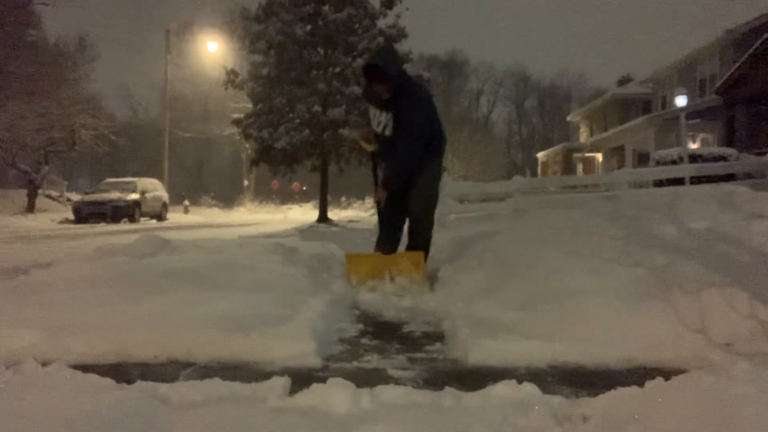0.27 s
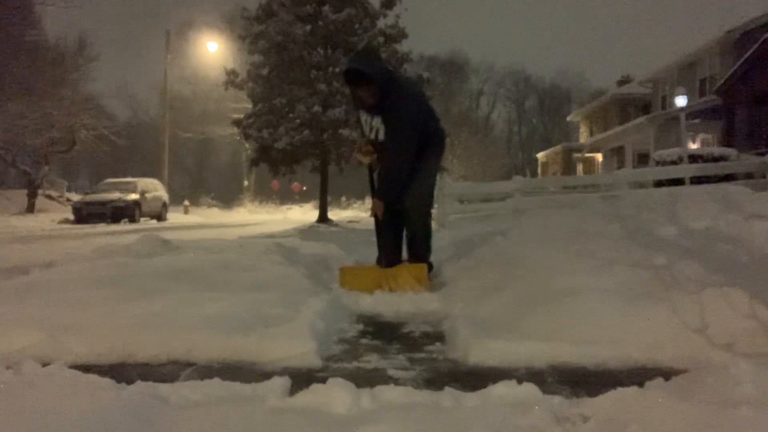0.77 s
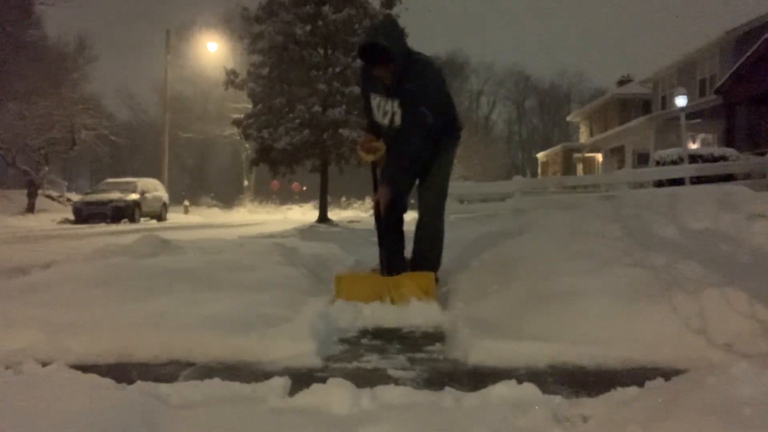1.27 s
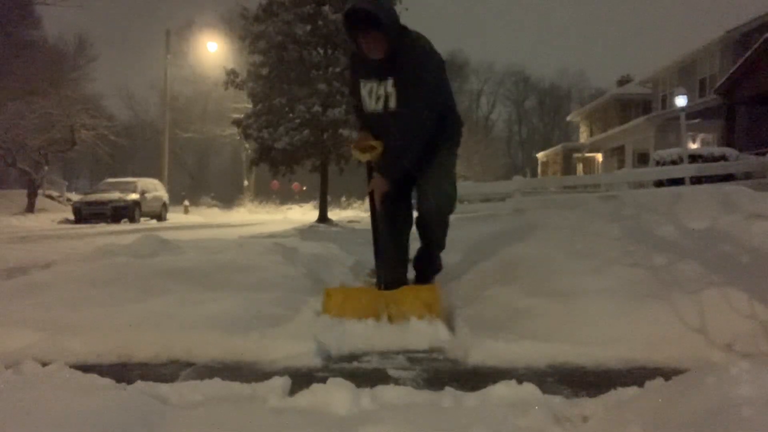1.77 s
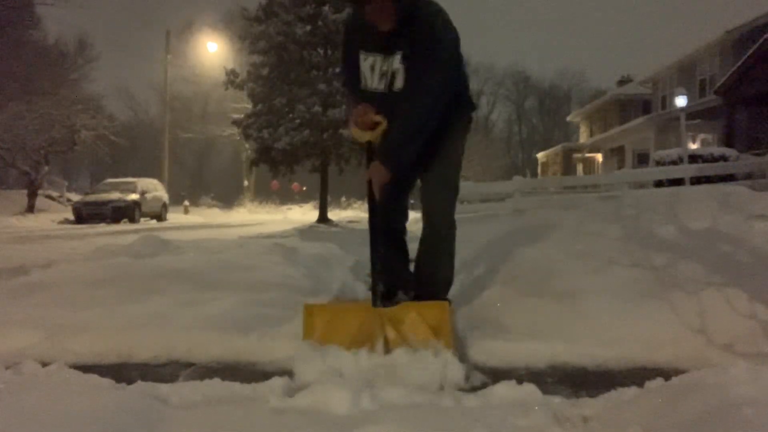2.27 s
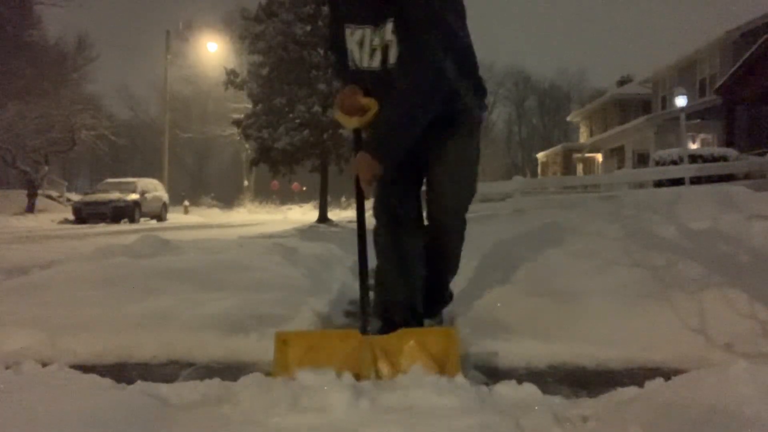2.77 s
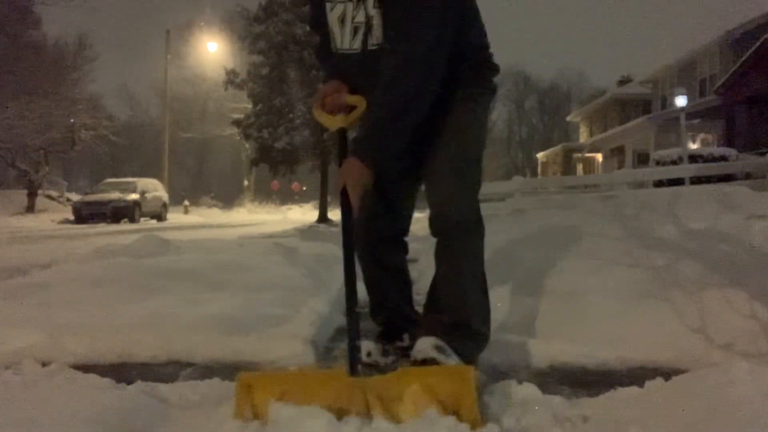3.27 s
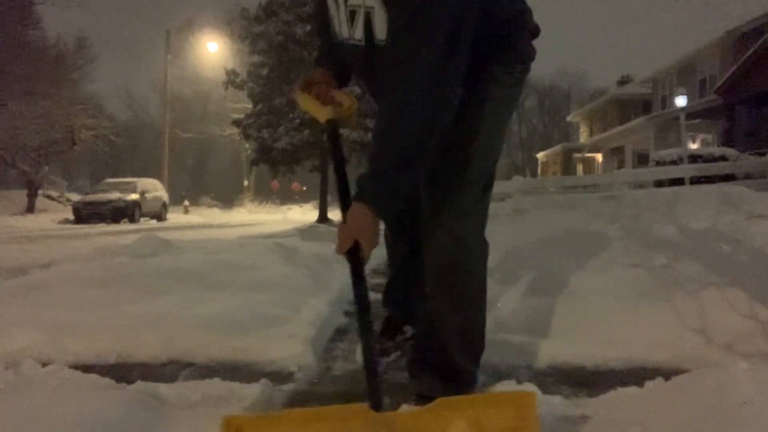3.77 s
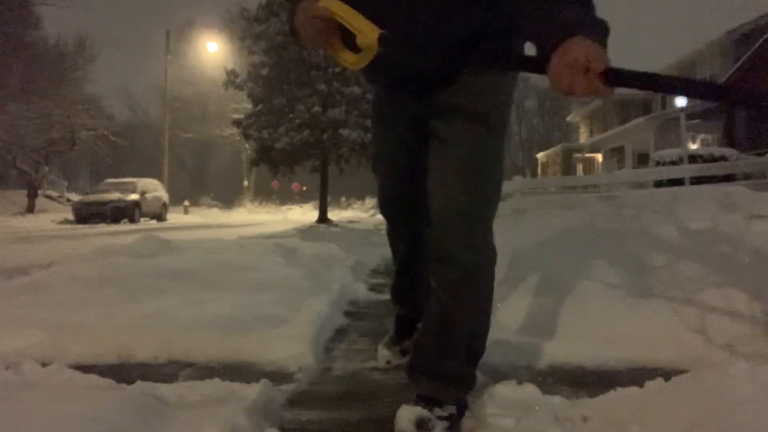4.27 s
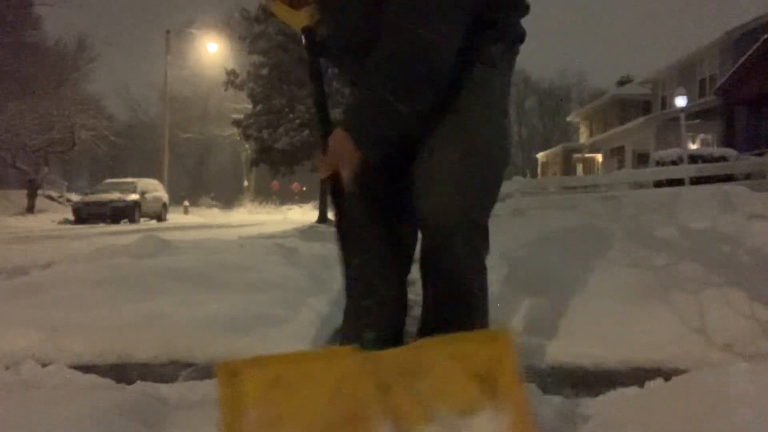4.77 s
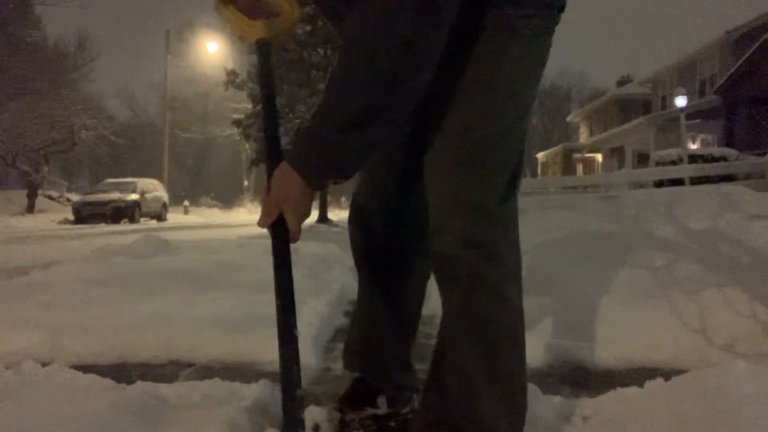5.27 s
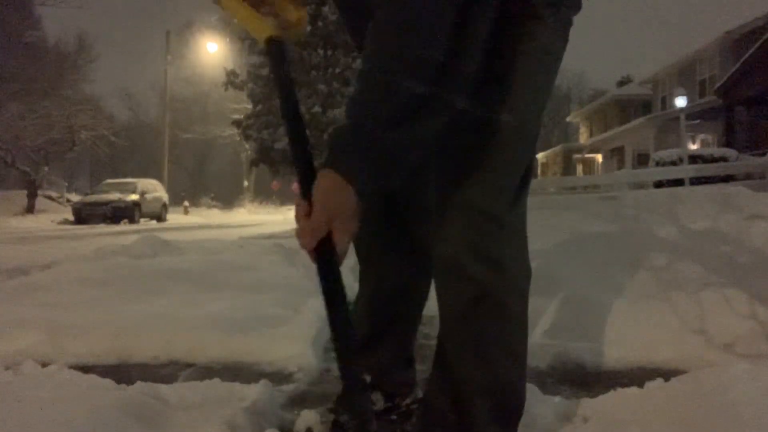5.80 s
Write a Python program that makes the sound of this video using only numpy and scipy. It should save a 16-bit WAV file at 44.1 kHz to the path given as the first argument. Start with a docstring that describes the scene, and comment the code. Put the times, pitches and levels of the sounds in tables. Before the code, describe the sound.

A plastic shovel scrapes snow along pavement in a long, juddering push, pauses, then scrapes twice more, louder and closer.

```python
"""A plastic snow shovel is pushed along a snowy driveway, flings its load, then scrapes twice close by.
Its edge sticks and slips on the pavement and rings the scoop; it catches on bumps and cracks grit,
while snow hisses over the plastic. Boots tread softly and the empty shovel squeaks on the backswing.
Light wind buffets the microphone, a far road murmurs, and a faint, narrow band of background hiss
is heard at the start; the snow swallows all echo."""
import sys
import numpy as np
from scipy import signal
from scipy.fft import rfft, irfft, next_fast_len
from scipy.io import wavfile
from scipy.ndimage import uniform_filter1d, map_coordinates

SR = 44100
rng = np.random.default_rng(int(sys.argv[2]) if len(sys.argv) > 2 else 0)


def int16_out(signal):
    """Quantize to a 16-bit WAV file."""
    q = np.round(np.clip(np.atleast_2d(signal).T, -1, 1) * 32767)
    wavfile.write(sys.argv[1], SR, q.astype(np.int16))


N = 266143
TIME = np.arange(N) / SR
SIZE = next_fast_len(N + SR // 2, True)
FREQ = np.arange(SIZE // 2 + 1) * SR / SIZE


def undb(db):
    """Decibels to gain."""
    return 10 ** (np.asarray(db) / 20)


def unit(x):
    """Scale to rms 1."""
    return x / np.sqrt(np.mean(x ** 2))


def curve(points):
    """Join (frequency, value) points on a log-frequency axis."""
    hz, value = np.transpose(points)
    return np.interp(np.log(FREQ + 1), np.log(hz), value)


def eq(points):
    """The minimum-phase filter that follows (frequency, level) points."""
    cepstrum = irfft(np.log(undb(curve(points))), SIZE)
    cepstrum[1:SIZE // 2] *= 2
    cepstrum[SIZE // 2 + 1:] = 0
    return np.exp(rfft(cepstrum))


def lowpass(hz):
    """Gain of a smooth low-pass; one minus it is the matching high-pass."""
    return 1 / (1 + (FREQ / hz) ** 4)


def resonance(hz, width):
    """Complex gain of one damped mode, 1 at its centre."""
    return 1j * FREQ * width / (hz ** 2 - FREQ ** 2 + 1j * FREQ * width)


def mode_bank(modes):
    """Complex gain of several modes ringing together."""
    return sum(undb(db) * resonance(hz, width) for hz, width, db in modes)


def through(x, gain):
    """Filter by a complex gain per frequency."""
    return irfft(rfft(x, SIZE) * gain, SIZE)[..., :N]


def struck(x, gain):
    """Filter so that a click of size 1 peaks at 1."""
    return through(x, gain / np.abs(irfft(gain, SIZE)).max())


def walk(rate):
    """A random drift of rms 1 that glides to a new value `rate` times a second."""
    hold = max(int(SR / rate), 1)
    return unit(uniform_filter1d(rng.standard_normal(N)[np.arange(N) // hold], hold))


def clicks(rate, spread_db):
    """Random clicks, `rate` a second; a few stand out louder, or softer if the spread is negative."""
    where, chance, polarity = rng.random((int(rate * N / SR), 3)).T
    size = undb(spread_db * np.minimum(-np.log(1 - chance), 4))
    return np.bincount((where * N).astype(int), size * np.sign(polarity - .5), N)


def steady(x, samples):
    """Ride out the slow changes of level and keep the grain."""
    power = np.mean(np.atleast_2d(x) ** 2, axis=0)
    return x / np.sqrt(np.abs(uniform_filter1d(power, samples)) + 1e-9)


def bursts(times, sizes, decay_s, crumble):
    """At each time one click, then a dying crumble; `crumble` weighs that tail against the click."""
    track, age = np.zeros(N + SR), TIME[:SR // 8]
    for start, size, decay in zip(times, sizes, np.broadcast_to(decay_s, len(times))):
        burst = rng.standard_normal(len(age)) * np.exp(-age / decay)
        burst *= crumble / np.linalg.norm(burst)
        burst[0] = 1
        at = int(start * SR)
        track[at:at + len(age)] += size * burst / np.linalg.norm(burst)
    return track[:N]


def stroke(start, length, swell_db, release_s, attack_s=.013, arch_db=1.5):
    """Envelope of one move: a quick bite, an arched hold that swells or fades, a release to -60 dB."""
    age = TIME - start
    progress = np.clip(age / length, 0, 1)
    hold_db = swell_db * (progress - .5) + arch_db * np.sin(np.pi * progress)
    release = np.exp(-np.log(1000) * np.maximum(age - length, 0) / release_s)
    return np.clip(age / attack_s, 0, 1) * undb(hold_db) * release


# deep rumble of wind on the microphone: (frequency [Hz], level [dB])
WIND_EQ = [(12,-25),(28,-20),(45,-2.5),(70,2),(110,-6),(170,-19.5),(260,-37.5),(500,-65),(2000,-63)]
# gusts: (centre time [s], half-width [s], level [dB])
GUSTS = [(0.7, 0.052, -43), (1.16, 0.1, -45), (1.94, 0.12, -48), (2.42, 0.07, -38.5), (2.88, 0.18, -44),
         (3.92, 0.1, -42.5), (4.74, 0.14, -43), (5.08, 0.058, -37.5), (5.55, 0.21, -34.5),
         (5.715, 0.042, -35.5), (5.88, 0.06, -42)]


def wind():
    """A freshening breeze and its gusts rumble on the two microphone ports, mostly on each separately."""
    buffet = rng.standard_normal((2, N)) + .64 * rng.standard_normal(N)
    breeze = undb(-53.5 + .9 * TIME + .5 * walk(8.8))
    gusts = sum(undb(db) * np.exp(-np.square((TIME - centre) / width)) for centre, width, db in GUSTS)
    return unit(through(buffet, eq(WIND_EQ))) * np.hypot(breeze, gusts)


# murmur of distant traffic: (frequency [Hz], level [dB])
ROAD_EQ = [(40,5),(200,6),(480,-1),(800,1),(1100,5),(1450,1),(2000,-10.5),(2700,-18),(3500,-19.5),(7000,-38),(11000,-27),(16000,-16.5)]


def far_road():
    """A far road lays a wide, steady wash under the scene."""
    wash = 1.03 * rng.standard_normal((2, N)) + rng.standard_normal(N)
    return unit(through(wash, eq(ROAD_EQ))) * undb(-61.5 + .47 * walk(25))


def narrow_hiss(start_db=-76, drop_db_per_s=4):
    """A faint, narrow band of background hiss near 2.3 kHz, heard at the start."""
    band = unit(through(rng.standard_normal((2, N)), resonance(hz=2300, width=220) ** 2))
    return band * undb(start_db - drop_db_per_s * TIME)


# the edge runs on the pavement until it stalls or lifts; boom and rasp are offsets from the level:
# (start [s], length [s], level [dB], swell [dB], release [s], boom [dB], rasp [dB])
SHOVES = [(0.29,0.21,-33.5,5.5,0.53,3,3),(0.553,0.091,-38.5,4,0.8,5,0.5),(0.735,0.36,-35,1.5,0.78,4,0),
          (1.063,0.25,-32,-0.5,0.15,-1.5,0),(1.351,0.02,-34.5,0.5,0.13,4,6),(1.393,0.058,-35,3.5,0.15,4.5,0.5),(1.517,0.021,-27.5,-6,0.13,-1.5,-1),
          (1.577,0.078,-30.5,2,0.28,1,-0.5),(1.67,0.058,-30,0,0.27,7,0),(1.741,0.036,-27,2,0.07,9,-2),(1.823,0.063,-31,-9.5,0.12,0,-4),(2.139,0.12,-31,6.5,0.28,3.5,0.5),
          (2.291,0.17,-34,5.5,0.46,9,1.5),(2.579,0.15,-27.5,0.5,0.14,8,1),(2.704,0.21,-22,5,0.41,2.5,-2.5),(3.021,0.14,-29.5,-1,0.04,1.5,-3),(3.17,0.15,-28,1.5,0.62,2.5,-3),
          (3.426,0.056,-43,0.5,0.35,7,3.5),(4.911,0.054,-24.5,13,0.21,1,0),(4.975,0.16,-17.5,1.5,0.0648,-3.5,-3),(5.134,0.04,-32,-1,0.4,-1,1.5),(5.363,0.03,-23.5,16.5,0.17,-8,1.5),
          (5.4,0.033,-19.5,-4,0.31,1,-3.5),(5.439,0.082,-28,5.5,0.45,6.5,-1),(5.56,0.23,-37,6.5,0.24,-2,1)]


def pressure():
    """The shoves as three envelopes: the boom, the body and the rasp of the scrape."""
    return sum(np.outer(undb([db + boom_db, db, db + rasp_db]), stroke(start, length, swell_db, release))
               for start, length, db, swell_db, release, boom_db, rasp_db in SHOVES)


def bending(share, t60_s, apart_hz):
    """Stereo path from a spot on the edge: the direct click, then bending waves, wider in the treble."""
    age = TIME[:SR // 8]
    tails = rng.standard_normal((2, len(age))) * np.exp(-np.log(1000) * age / t60_s)
    mid, side = rfft(tails / np.linalg.norm(tails, axis=1, keepdims=True), SIZE)
    apart = FREQ / (FREQ + apart_hz) * np.array([[1], [-1]])
    return 1 + share * lowpass(4350) * (mid * FREQ / (FREQ + 350) + apart * side)


def stick_slip():
    """Coarse slips and fine sand at six spots on the edge, each with its own pitch and wandering load."""
    judder = undb(2.2 * walk(45) + 2.6 * walk(170))
    force = 0
    for hz in np.geomspace(300, 4800, 6):
        load = undb(3.8 * walk(24))
        slips = steady(judder * clicks(rate=380, spread_db=3.2), samples=2600)
        sand = unit(judder * clicks(rate=2600, spread_db=2.3))
        spot = .42 + resonance(hz, .36 * hz)
        path = bending(share=.85, t60_s=.07, apart_hz=1700)
        force = force + rfft(load * (slips + .5 * sand), SIZE) * spot * path
    return steady(irfft(force, SIZE)[:, :N], samples=1200)


# broad tone of the plastic scoop: (frequency [Hz], level [dB])
SCOOP_EQ = [(40,-41),(100,-7.5),(160,-7),(225,-6),(310,-2),(450,0),(610,-4),(800,-8),(1100,-9.5),(1900,-12),(2700,-20),(5000,-27.5),(7500,-29),(16000,-49)]
# its damped resonances: (frequency [Hz], width [Hz], level [dB])
SCOOP_MODES = [(159,35,-4),(196,22,-2.5),(303,24,-8.5),(359,44,0.5),(535.4,53,-7),(714,49,-8.5),(838,14,-6.5),(1130,113,-8),(1470,50,-11),(1750,220,-19),(3134,98,-6),(4320,68,-9)]


def scoop_tone():
    """The broad colour of the scoop with its resonances standing out."""
    return eq(SCOOP_EQ) * (1 + mode_bank(SCOOP_MODES))


def treble_modes(share, decay_s, from_hz):
    """The blade's many close treble modes, falling differently each time."""
    age = TIME[:SR // 8]
    ring = rng.standard_normal(len(age)) * age * np.exp(-np.log(1000) * age / decay_s)
    blend = share * (1 - lowpass(from_hz))
    return (1 + blend * rfft(ring / np.linalg.norm(ring), SIZE)) / np.sqrt(1 + blend ** 2)


# resonances woken by the point of contact: (frequency [Hz])
CONTACT_HZ = [1470, 1820, 2310]


def wandering_contact(x, depth=.35):
    """As the contact moves along the edge, the middle resonances swell and sink."""
    return x + sum(depth * walk(16) * through(x, resonance(hz, .2 * hz)) for hz in CONTACT_HZ)


def flexing(x, pitch_share=.013):
    """The blade bends under the load, so its resonances drift up and down together."""
    position = np.arange(N) + np.cumsum(pitch_share * walk(10))
    return np.array([map_coordinates(side, [position], order=3, mode="mirror") for side in x])


def crunch(grains_per_s=100, pitches=12):
    """Coarse grains break under the edge one by one, each with a short pitched ring."""
    grains = 0
    for hz in np.geomspace(1200, 5200, pitches):
        breaks = clicks(rate=grains_per_s / pitches, spread_db=2.2)
        grains = grains + rfft(breaks, SIZE) * resonance(hz, .13 * hz) * (hz / 1200) ** -1.5
    path = bending(share=.7, t60_s=.025, apart_hz=1000)
    return unit(irfft(grains * path, SIZE)[:, :N])


# narrow modes that ring freely once the snow is out: (frequency [Hz], width [Hz], level [dB])
EMPTY_DISH_MODES = [(190,19,-0.5),(291,21,2),(408,26,-2),(542,22,-1),(751,25,1.5),(853,17,-2),(930,21,-2),(1195,63,3.5),(1510,33,-2),(2020,46,-8),(2950,50,-7),(3770,50,-8)]
# each push holds the blade at a new angle and favours other resonances: (start [s], low [Hz],
# low level [dB], middle [Hz], middle level [dB], edge [Hz], edge level [dB], empty dish level [dB])
BLADE_ANGLES = [(0,740,-9,1820,-7.5,3170,1.5,-30),(1.335,640,-11,1830,-7,3160,-4,-30),(1.679,800,3,1880,-1,3080,-1,-28),(2.1,515,-0.5,2050,-3,2840,5,-32),(2.55,427,-6.5,2080,-2.5,4240,3,-20),(3.019,370,-13,1780,-0.5,2290,-21,-18),(4.8,320,-11,1450,-20,4170,8,-0.5),(5.3,874,2.5,1900,-10,3200,-30,-11)]


def scrape(boom, body, rasp):
    """The slips shake the scoop push by push; a loaded scoop booms, a steep edge rasps."""
    shaken = rfft(stick_slip(), SIZE) * scoop_tone()
    dish = mode_bank(EMPTY_DISH_MODES)
    plastic = 0
    for start, low_hz, low_db, middle_hz, middle_db, edge_hz, edge_db, dish_db in BLADE_ANGLES:
        favoured = mode_bank([(low_hz, 226, low_db), (middle_hz, 340, middle_db), (edge_hz, 260, edge_db)])
        angle = 1 + favoured + undb(dish_db) * dish
        treble = treble_modes(share=.9, decay_s=.028, from_hz=1500)
        coloured = unit(irfft(shaken * angle * treble, SIZE)[:, :N])
        plastic = np.where(TIME >= start, coloured, plastic)
    plastic = steady(wandering_contact(plastic), samples=1100)
    low, high = lowpass(283), 1 - lowpass(1180)
    edge = undb(-.63) * flexing(through(plastic, high)) + undb(-15.5) * crunch()
    bands = through(plastic, low) * boom + through(plastic, 1 - low - high) * body + edge * rasp
    uneven_pavement = undb(-2 + .5 * walk(16))
    return bands * sticking(hold_s=.02, depth_db=7.5) * uneven_pavement


# the edge hits a bump or the scoop is jolted; thud and ring are offsets from the level:
# (time [s], relative level [dB], thud [dB], hollow ring [dB])
CATCHES = [(0.297,-24.5,0,-18),(0.485,-23,8,-4),(0.629,-22,1.5,-3),(0.803,-20,-3,-13),(0.933,-21.5,1,-10),
           (1.066,-27,10,2),(1.107,-35,3,-9),(1.163,-16,-3,-9),(1.201,-24,2,2),(1.344,-25.5,-4,-10),(1.369,-31,-7,-18),(1.396,-27,-4,-10),
           (1.504,-23,-8,-8),(1.524,-28,9.5,-7.5),(1.568,-18,-11,-3),(1.622,-25,3,-6),(1.701,-19.5,10.5,-14),(1.749,-22.5,6,0),(1.776,-25.5,11.5,-6),(1.784,-19,0,-9),
           (1.834,-31,6,-7),(2.152,-29,-6,-12),(2.244,-36,4,-12),(2.31,-35,4,-10),(2.528,-23.5,-18,-13.5),(2.564,-23,-22,-2),(2.734,-13,1,-12),(2.763,-10.5,-6,-4),(2.867,-18.5,5,0),(2.905,-22,12,1),(2.924,-19,-13,-5),(3.063,-19,-1,-10),
           (3.171,-22,-6,0),(3.221,-20.5,5,0),(3.267,-33,-8,-8),(3.412,-17,-9,1),(3.487,-27.5,-12,-5),(4.22,-45.5,17,-10),(4.648,-41,4,-16),
           (4.912,-10.5,-15,-9),(4.966,-15,-4,-15),(4.997,-14.5,2,-16),(5.038,-8.5,9,-6),(5.061,-12,-1,-18),(5.089,-18.5,9,-8),(5.118,-21,11,-8),
           (5.373,-21,-8,4.5),(5.398,-14.5,3,-6),(5.431,-19,10,-8),(5.459,-35,9,-8),(5.494,-21,5,-4),(5.538,-27,4,-9),(5.608,-33,-11,-13),(5.641,-27,-4,-8),(5.74,-26,-6,-11),(5.779,-22.5,-10,-9),(5.809,-21,-10,-10)]
# a hard snag rings the plastic brighter than the scrape: (frequency [Hz], boost [dB])
SNAG_EQ = [(150,-12),(450,-4),(900,2.5),(2000,8),(4500,0.5),(16000,0)]
# hollow ring of the knocked dish: (frequency [Hz], width [Hz], level [dB])
HOLLOW_MODES = [(735,42,-20.5),(855,30,-17),(1000,88,1),(1500,180,-8),(1830,220,7),(2650,77,-24)]


def catches():
    """The edge snags and lets go: a plastic clack, a thud of the whole scoop, a hollow ring of its dish."""
    times, db, thud_db, hollow_db = np.transpose(CATCHES)
    scoop = scoop_tone()
    clack = struck(bursts(times, undb(db), decay_s=.006, crumble=4), scoop * undb(curve(SNAG_EQ)))
    thud = struck(bursts(times, undb(db + thud_db), decay_s=.0075, crumble=1.3), scoop * lowpass(930))
    hollow = struck(bursts(times, undb(db + hollow_db), decay_s=.0025, crumble=.5), mode_bank(HOLLOW_MODES))
    return undb(-2.5) * clack + undb(-7.5) * thud + undb(-4) * hollow


def sticking(hold_s, depth_db):
    """Just before each catch the edge is held fast and the scrape ducks."""
    held, dip = np.zeros(N), np.hanning(int(hold_s * SR))
    for time, *_ in CATCHES:
        at = int(time * SR)
        held[at - len(dip):at] += dip
    return undb(-depth_db * held)


# hiss of sliding snow: (frequency [Hz], level [dB])
POWDER_EQ = [(100,-32),(350,15.5),(700,7),(1500,11.5),(3000,5.5),(7000,5),(12000,1),(16000,2)]
# the scoop carries, sheds or cuts into snow: (start [s], length [s], level [dB], swell [dB], release [s])
SLIDES = [(0.35,2.99,-58,13,0.72),(3.513,0.17,-57.5,4.5,1.0),(4.193,0.046,-54,-2,0.15),(4.63,0.042,-53.5,-1.5,0.56),
          (4.819,0.19,-40,17.5,0.84),(5.296,0.73,-54,-16.5,0.44)]


def snow_hiss(push):
    """Countless crystals hiss across the plastic as the snow slides, and with every shove."""
    flutter = undb(1.2 * walk(80) + 1.2 * walk(12))
    left, right, middle = (steady(clicks(rate=5000, spread_db=3.2), samples=1600) * flutter
                           for _ in range(3))
    grains = middle + through(np.array([left, right]), .15 + .8 * lowpass(5330))
    sliding = sum(undb(db) * stroke(start, length, swell_db, release_s, attack_s=.031)
                  for start, length, db, swell_db, release_s in SLIDES)
    return unit(through(grains, eq(POWDER_EQ))) * np.hypot(sliding, undb(-29.5) * push)


# the loudest cracks of grit and ice under the edge: (time [s], relative level [dB], crumble decay [ms])
CRACKS = [(0.932,-44.5,3.3),(1.369,-62,4),(1.537,-40.5,1.6),(1.548,-40,1.6),(1.57,-37,2.2),(1.58,-42,2.8),(1.851,-48,2.2),(2.245,-40.5,3),(2.358,-40,6.2),(2.445,-37,3.8),(2.527,-34.5,7.8),(2.564,-32.5,38),(2.724,-35,3.3),(2.735,-28.5,3.2),
          (2.754,-32.5,6.5),(2.89,-32.5,3.5),(2.925,-35,2.9),(3.414,-52,2),(3.494,-47,1.7),(4.159,-54,1.8),(4.22,-39.5,0.87),(4.235,-51,1.4),(4.912,-26.5,2.1),(4.966,-22,12),(4.997,-25,1.4),(5.008,-32,1.8),(5.064,-25,2.4),(5.119,-30.5,5.5),(5.43,-29,2.6)]
# bright tick of a bursting grain: (frequency [Hz], level [dB])
CRACK_EQ = [(300,-27),(1500,5.5),(4000,7.5),(7000,8.5),(11000,4),(14000,-11.5),(16000,-16)]


def grit(push):
    """Hard grains burst with a tick and crumble; small ones crackle as hard as the edge is pushed."""
    times, db, crumble_ms = np.transpose(CRACKS)
    tone = eq(CRACK_EQ)
    cracks = struck(bursts(times, undb(db), decay_s=crumble_ms / 1000, crumble=2.5), tone)
    crackle = unit(through(clicks(rate=70, spread_db=-4), tone))
    return undb(16.5) * cracks + undb(-28.5) * push * crackle


# the loaded scoop drops over a bump: (time [s], level [dB], pitch [Hz])
THUMPS = [(1.073,-26,129),(1.088,-23,127),(1.104,-26.5,124),(2.438,-21.5,152),(2.633,-23,150),(2.646,-15.5,154),(2.736,-17.5,148),(2.95,-21,150),(3.313,-26,148),(4.22,-38.5,140),(4.239,-40.5,138)]


def thumps():
    """The whole scoop flexes at its lowest, well-damped modes; the load sets their pitch."""
    track = 0
    for time, db, hz in THUMPS:
        modes = resonance(hz, 38) + undb(-4) * resonance(1.53 * hz, 72)
        drop = bursts([time], [undb(db)], decay_s=.005, crumble=.3)
        track = track + struck(drop, modes * lowpass(900))
    return track


# boots landing in snow: (time [s], relative level [dB])
STEPS = [(2.029, -29), (2.064, -33), (3.535, -41), (4.647, -34), (4.671, -44), (4.858, -38.5)]
# muffled tone of a tread: (frequency [Hz], level [dB])
BOOT_EQ = [(60,-13),(200,8),(380,11.5),(700,-11),(1600,-9),(3500,-19),(16000,-57)]


def footsteps():
    """Snow packs under a boot with a short dull crunch."""
    times, db = np.transpose(STEPS)
    return undb(2.5) * struck(bursts(times, undb(db), decay_s=.049, crumble=19), eq(BOOT_EQ))


def fling():
    """The thrown powder swishes through the air, swelling until it leaves the scoop."""
    spray = through(rng.standard_normal(N) + .17 * rng.standard_normal((2, N)), 1 - lowpass(5100))
    swing = stroke(start=3.75, length=.5, swell_db=16, release_s=.3, attack_s=.031)
    return unit(spray) * undb(-64.5) * swing


# tiny squeaks as the shovel swings back empty: (start [s], length [s], level [dB], pitch [Hz])
SQUEAKS = [(4.371,0.03,-73,3150),(4.424,0.019,-73,3100)]


def squeaks():
    """A few quick slips ring one narrow resonance, like a glove turning on the handle."""
    track = 0
    for start, length, db, hz in SQUEAKS:
        ring = unit(through(clicks(rate=330, spread_db=2), resonance(hz, width=260) ** 2))
        track = track + ring * undb(db) * stroke(start, length, swell_db=0, release_s=.084)
    return track


def scene():
    """Shovel and boots straight ahead, over a bed of open air."""
    boom, push, rasp = pressure()
    knocks = through(catches() + grit(push), bending(share=.8, t60_s=.04, apart_hz=1500))
    shovel = scrape(boom, push, rasp) + knocks + thumps() + snow_hiss(push) + fling()
    return shovel + footsteps() + wind() + far_road() + squeaks() + narrow_hiss()


# stereo tilt of the two microphone ports: (frequency [Hz], left minus right [dB])
PORT_BALANCE = [(60,0),(200,3.9),(400,3.6),(700,2),(1300,-1.2),(2400,-1.1),(8000,-.3),(15000,0)]
# phase between the ports: (frequency [Hz], lag of the left [rad])
PORT_LAG = [(20,0),(1000,.35),(3000,.6),(5000,1.2),(7000,2.3),(8200,np.pi),(10300,np.pi),(12600,0)]


def record(dry, top_hz=15800):
    """Two microphone ports near the ground colour and delay the sound differently; the top is cut."""
    left = undb(curve(PORT_BALANCE) / 2) * np.exp(-1j * curve(PORT_LAG) / 2)
    ports = through(dry, np.array([left, 1 / left]))
    return signal.sosfilt(signal.ellip(10, .1, 80, top_hz, fs=SR, output="sos"), ports)


dry = scene()
out = record(dry)
int16_out(out)
```